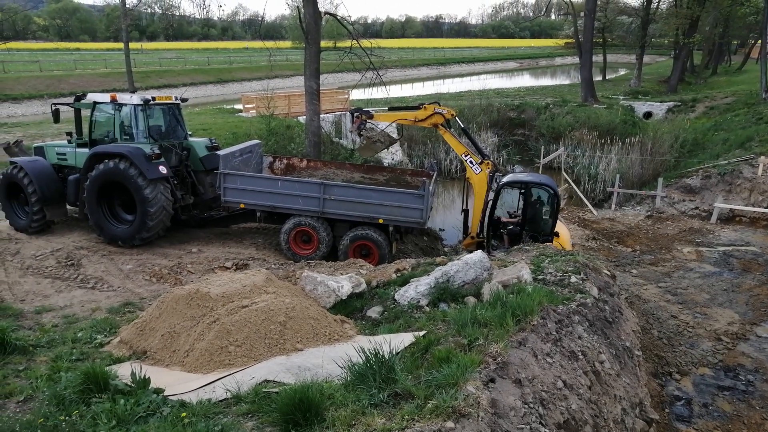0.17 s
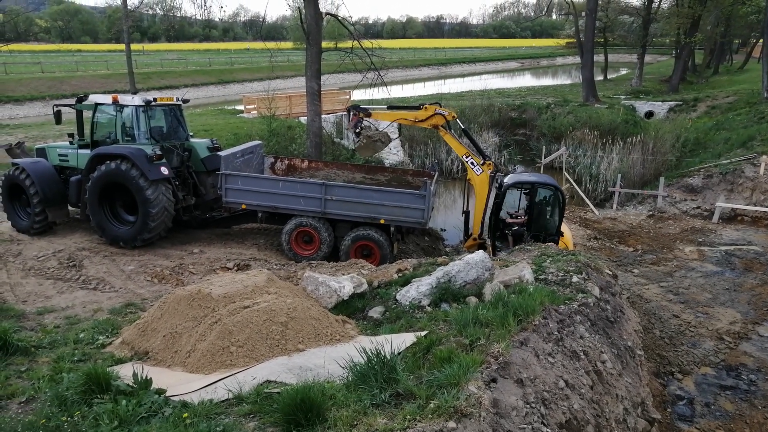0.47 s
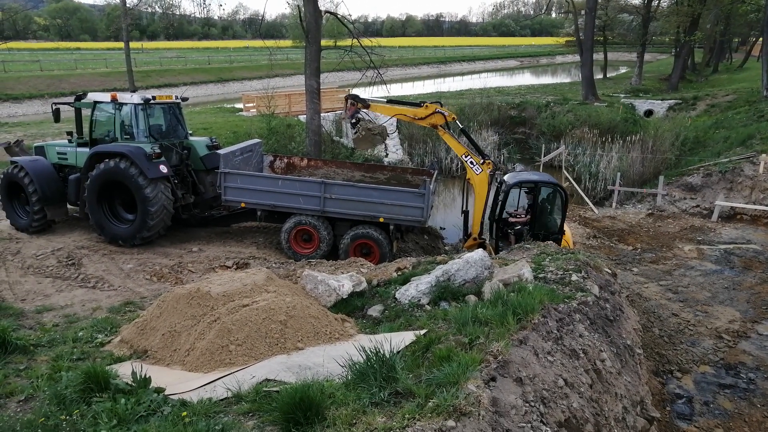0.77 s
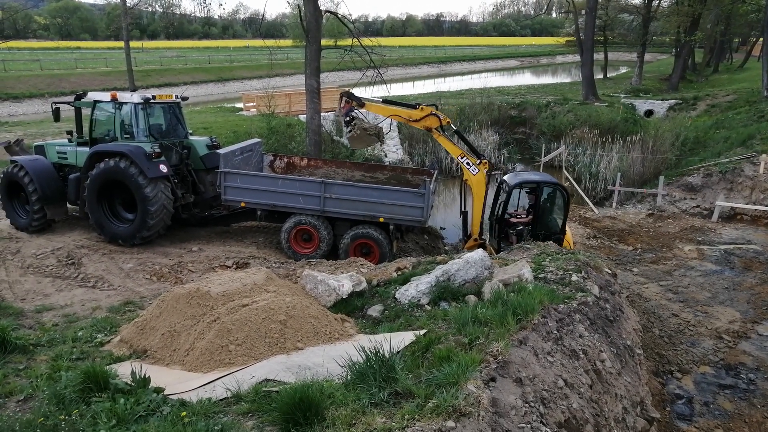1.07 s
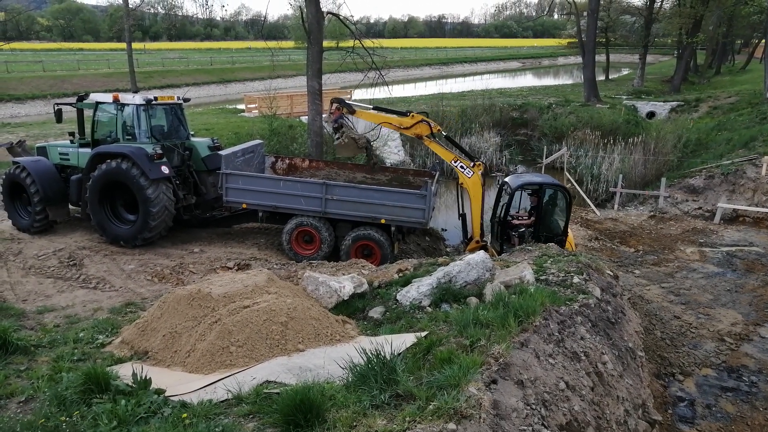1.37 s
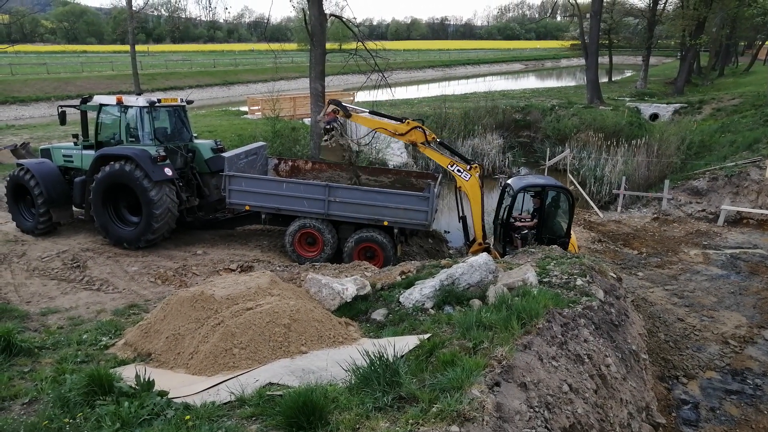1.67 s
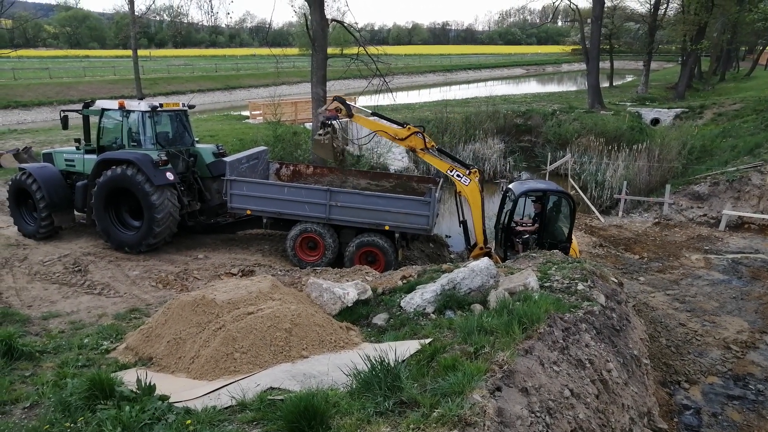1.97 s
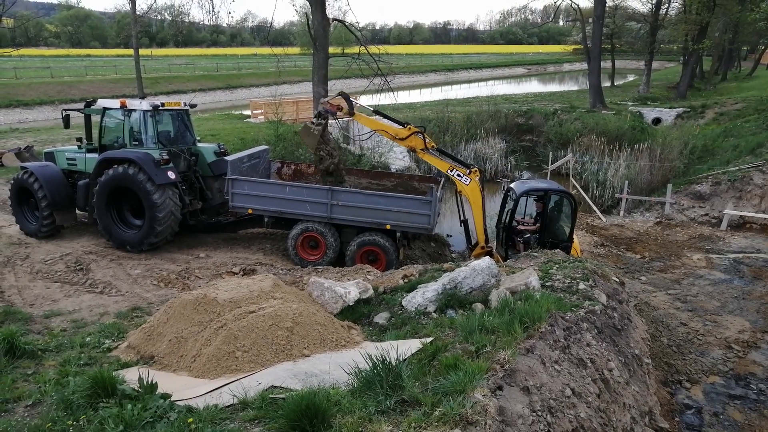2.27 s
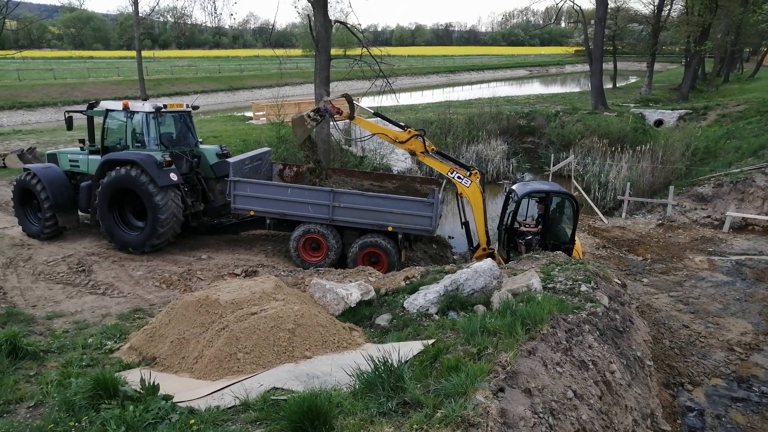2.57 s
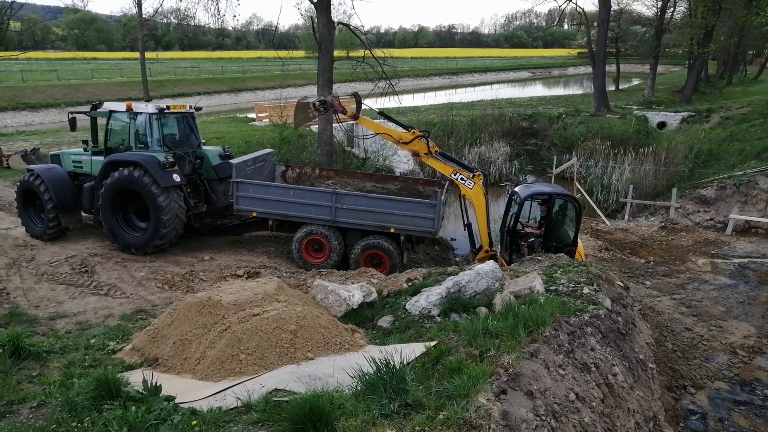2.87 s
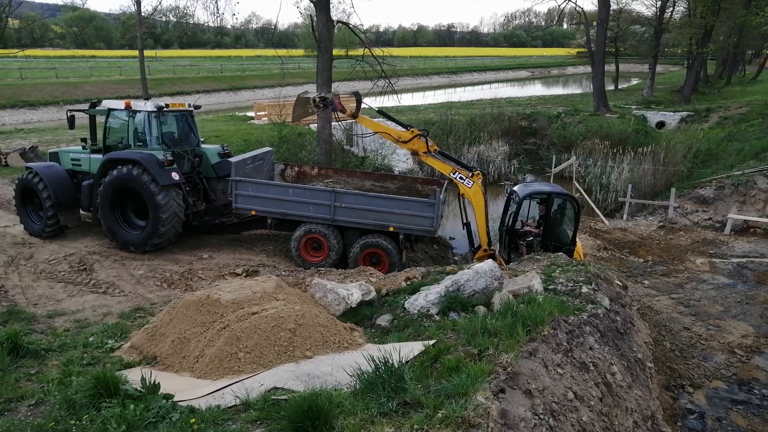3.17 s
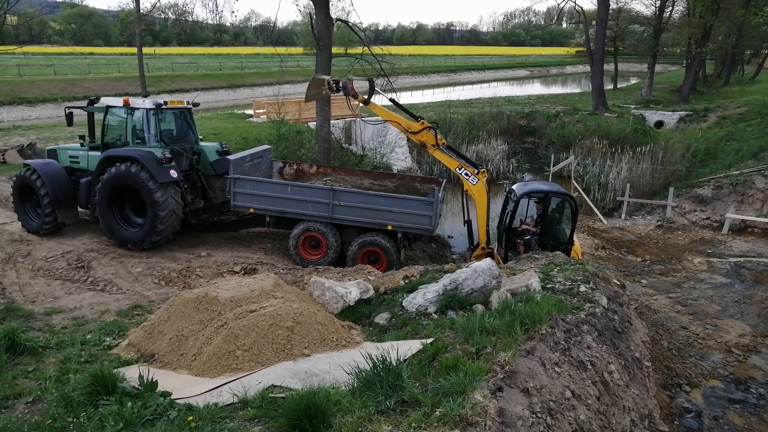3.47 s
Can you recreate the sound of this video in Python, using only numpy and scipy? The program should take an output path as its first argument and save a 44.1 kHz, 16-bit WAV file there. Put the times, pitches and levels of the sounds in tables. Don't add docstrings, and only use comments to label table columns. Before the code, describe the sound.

Earth and stones drop into a trailer in an open yard, single crumbling bursts growing into two gritty surges with ringing pebbles and dull thuds; a diesel idles low, and a faint bird whistles left at the end.

```python
import sys
import numpy as np
from scipy import signal
from scipy.fft import rfft, irfft
from scipy.io import wavfile
from scipy.ndimage import uniform_filter1d

SR = 44100
rng = np.random.default_rng(int(sys.argv[2]) if len(sys.argv) > 2 else 0)


def elevation(decibels):
    levels = np.asarray(decibels, float)
    return 10 ** (levels / 20)


def wav_record(signal):
    frames = np.transpose(np.atleast_2d(signal))
    bounded = np.clip(frames, -1, 1)
    quanta = np.round(bounded * 32767).astype(np.int16)
    wavfile.write(sys.argv[1], SR, quanta)


N = 160083


def rms(x):
    return np.sqrt(np.mean(x ** 2))


def band(x, lo_hz, hi_hz, order=2):
    sos = signal.butter(order, [lo_hz, min(hi_hz, .45 * SR)], "band", fs=SR, output="sos")
    return signal.sosfilt(sos, x)


def curve(table, column):
    table = np.array(table, float)
    return np.interp(np.arange(N) / SR, table[:, 0], table[:, column])


def walk(rate_hz):
    hold = int(SR / rate_hz)
    steps = np.repeat(rng.standard_normal(N // hold + 1), hold)
    w = uniform_filter1d(uniform_filter1d(steps, hold), hold)[:N]
    return w / w.std()


def pair(make, alike):
    alike = np.clip(alike, 0, 1)
    return np.sqrt(alike) * make() + np.sqrt(1 - alike) * np.array([make(), make()])


# [dB, load on the exhaust boom]
ENGINE_RUN = [(0, 48.2, -41.5, -4), (.25, 49.39, -43.5, -9), (.75, 50.15, -45, -17), (.9, 51.32, -45, 8),
              (1.3, 50.68, -48, 4.5), (1.75, 50.57, -45, 3.5), (2.5, 48.48, -47, 1.5),
              (2.98, 48.86, -48.5, 3), (3.18, 53.3, -45, 9.5), (3.35, 50.5, -44, 8), (3.63, 49, -44.5, -2)]
# order [multiple of firing rate], level_db [dB]
FIRING_ORDERS = [(1, 1), (2, -12.5), (2.25, -15.5), (2.5, -18.5), (3, -17), (4, -14), (4.5, -21), (5, -24),
                 (6, -26.5)]


def engine():
    phase = 2 * np.pi * np.cumsum(curve(ENGINE_RUN, 1)) / SR
    x = 0
    for order, level_db in FIRING_ORDERS:
        k = round(4 * order) / 4
        wavers = k > 1
        level = elevation(level_db + wavers * 3 * walk(9.07))
        jitter = 0.11 * k * walk(4.74) * wavers
        x = x + level * np.sin(k * phase + jitter + 6 * rng.random())
    boom = elevation(-10.5 + curve(ENGINE_RUN, 3) + 0.14 * walk(13.88))
    x = x + boom * np.sin(3.5 * phase)
    return np.sqrt(2) * elevation(curve(ENGINE_RUN, 2) - 6.5) * x


# [dB of extra dust, falling and in the air]
DRYNESS = [(0, 2), (.66, 3), (.76, 0), (1.16, -6), (1.19, 1), (1.62, 4), (1.8, 2), (2.7, 0.5), (2.95, -3.5),
           (3.25, 0.5), (3.45, -2.5)]


def dryness_db():
    return curve(DRYNESS, 1)


# pitch_hz [Hz], level_db [dB per Hz]
YARD_SPECTRUM = [(32, -8), (70, -8.5), (180, 2.5), (420, -21), (750, -12.5), (1500, -21), (4000, -36.5),
                 (14000, -26.5)]


def yard():
    out, swell, table = 0, walk(0.84), np.array(YARD_SPECTRUM, float)
    for hz in 30 * 2 ** np.arange(0, 9.1, .5):
        noise = pair(lambda: rng.standard_normal(N), 1 - hz / 1520.0)
        x = band(noise, hz / 1.35, hz * 1.15, order=1)
        level_db = np.interp(np.log(hz), np.log(table[:, 0]), table[:, 1])
        level_db = level_db + (hz > 7000) * dryness_db() + 0.25 * swell + 1.3 * walk(8.0)
        out = out + x * elevation(level_db)
    return out * elevation(-58.5) / rms(out)


# start_s [s], coarse_db [dB], fine_db [dB], crumble_s [s]
CLOD_HITS = [(0.043, -48.5, -42.5, 0.048), (0.292, -39, -42, 0.022), (0.4529, -33, -51, 0.016),
             (0.476, -35, -56, 0.019), (0.573, -50.5, -42.5, 0.014), (0.6878, -33, -38, 0.02),
             (0.8793, -38, -40.5, 0.0092), (0.908, -64, -44, 0.013), (0.985, -30, -49, 0.018),
             (1.0565, -62, -75, 0.018), (1.1792, -46, -40, 0.015), (1.202, -28, -30, 0.016),
             (1.27, -39, -31, 0.024), (1.3045, -47, -38, 0.024), (1.3359, -32, -31, 0.024),
             (1.3881, -50, -39, 0.01), (1.474, -35, -34, 0.01), (1.5194, -58, -37.5, 0.016),
             (1.552, -43, -36, 0.023), (1.6, -39.5, -37.5, 0.023), (1.713, -54, -32.5, 0.011),
             (1.86, -35.5, -35, 0.015), (2.0906, -34, -56, 0.018), (2.3394, -59, -39.5, 0.018),
             (2.4878, -39, -37, 0.023), (3.004, -26, -31, 0.026), (3.1394, -51, -56, 0.021),
             (3.356, -36.5, -44.5, 0.024), (3.489, -29, -65, 0.022), (3.5444, -42.5, -55, 0.021)]


def clod_power(column, offset_db):
    t, power = np.arange(N) / SR, np.zeros(N)
    for row in CLOD_HITS:
        crumble_s = max(row[3], .004)
        age = np.clip(t - row[0] + .003, 0, None)
        rise = 1 - np.exp(-age / (.3 * crumble_s))
        fall = np.exp(-(age / crumble_s) ** 2) + elevation(-8.5) * np.exp(-age / 0.045)
        power += (elevation(row[column] + offset_db) * rise * fall) ** 2
    return power


def grit(lo_hz, hi_hz, per_s, spread_db, alike, order=4):
    def draw():
        size = rng.standard_normal(N) * (rng.random(N) < per_s / SR)
        return size * elevation(spread_db * np.clip(-np.log(rng.random(N) + 1e-9), 0, 3))
    x = band(pair(draw, alike), lo_hz, hi_hz, order=order)
    return x / rms(mics(x[:, :N // 3]).mean(axis=0))


def pebbles(hz):
    return elevation(-11) * grit(.97 * hz, 1.03 * hz, 130, 0.89, alike=0.82, order=1)


# start_s [s], coarse_db [dB, soil], fine_db [dB, grit], lumps_db [dB]
POURS = [(1.17, -58.5, -56, -99), (1.42, -61, -52, -60), (1.46, -65, -59.5, -69), (1.7, -63, -51.5, -89),
         (1.745, -53, -44, -55), (1.77, -43.5, -38.5, -52), (1.94, -46.5, -42, -57),
         (2.1, -47.5, -43.5, -51), (2.22, -53.5, -50.5, -50.5), (2.26, -55.5, -53.5, -48.5),
         (2.47, -51.5, -44, -54), (2.51, -44, -42, -52), (2.66, -39, -37, -46.5), (2.9, -40, -37.5, -52),
         (3.17, -47, -46.5, -54.5), (3.21, -58, -53.5, -61), (3.42, -58.5, -59, -59),
         (3.63, -76.5, -74, -65)]


def soil():
    pouring = np.arange(N) / SR > POURS[0][0]
    surge = walk(28.19)

    def envelope(column, clods, patchy_db):
        patches = np.minimum(0.5 * surge + walk(45.01), 2)
        pour = elevation(curve(POURS, column) + patchy_db * patches)
        return np.sqrt(clods + pouring * pour ** 2)

    knock, spray = clod_power(1, -11), clod_power(2, -8)
    coarse = grit(964, 3455, 4000, 0.91, alike=0.43) + pebbles(2038) + pebbles(2500)
    fine = grit(3220, 8080, 5000, 2.0, alike=0.23) + pebbles(4660) + pebbles(5200)
    dust = elevation(-10.5 + dryness_db()) * grit(8900, 15350, 900, 1.2, alike=0.19, order=2)
    lumps = grit(344, 1040, 3000, 0.98, alike=0.93, order=2)
    return (envelope(1, knock, 1.0) * coarse
            + envelope(2, spray, 1.0) * fine
            + envelope(2, spray * elevation(2 * -4), 1.0) * dust
            + envelope(3, knock * elevation(2 * -20), 1.2) * lumps)


# start_s [s], level_db [dB], pitch_hz [Hz]
PEBBLE_TICKS = [(0.244, -54, 8800), (0.349, -51, 10000), (.37, -45, 10500), (.575, -42, 8000),
                (.477, -46, 12500), (0.615, -41, 12900), (.645, -42, 13000), (0.695, -31, 4900),
                (.733, -40, 8100), (1.336, -30, 5200), (1.556, -31, 5300), (1.715, -29, 5140),
                (2.211, -26, 5200), (2.34, -29.5, 5300), (2.487, -29.5, 5300), (1.176, -49, 11100),
                (1.527, -44, 11000), (1.624, -40, 12000), (2.363, -37, 11000), (3.244, -47, 10000),
                (3.529, -53, 11050)]


def ticks():
    out, t = np.zeros((2, N + SR)), np.arange(SR // 2) / SR
    for s, db, hz in PEBBLE_TICKS:
        snap = rng.standard_normal((2, len(t))) + 0.59 * np.cos(2 * np.pi * hz * t)
        snap = band(snap * np.exp(-t / 0.0018), 0.62 * hz, min(2 * hz, 15300))
        k = int(s * SR)
        out[:, k:k + len(t)] += elevation(db - 1.0 - 10.2 * (hz < 6500)) * snap
    return out[:, :N]


# start_s [s], level_db [dB], pitch_hz [Hz]
LARGE_STONES = [(0.4565, -35, 2600), (0.4743, -30, 2070), (0.6945, -34.5, 2450), (0.9888, -32.5, 2330),
                (1.2076, -31, 2270), (1.7522, -30.5, 2590), (1.7796, -29.5, 2264), (1.8607, -31, 2180),
                (1.9174, -34, 2500), (2.0872, -38, 2480), (2.169, -32, 2040), (2.3156, -38, 2434),
                (2.3875, -38.5, 2400), (2.4794, -40, 2570), (2.5074, -27, 2240), (2.584, -30, 2440),
                (2.6326, -29, 2520), (2.6644, -32, 2480), (2.7324, -23.5, 2340), (2.796, -30, 2450),
                (2.9237, -28, 2614), (3.007, -25, 2600), (3.0924, -24, 3170), (3.1795, -34, 2660),
                (3.4954, -33, 2400)]
# start_s [s], level_db [dB], pitch_hz [Hz]
SMALL_STONES = [(1.276, -34, 5300), (1.474, -30.5, 5130), (1.7491, -25, 5310), (1.8527, -32.5, 5090),
                (1.93, -31, 5170), (2.0115, -24.5, 5240), (2.0531, -24.5, 5200), (2.0908, -26, 5260),
                (2.1819, -36, 5300), (2.2934, -40, 5390), (2.4036, -28.5, 5400), (2.6195, -23, 5240),
                (2.6647, -25, 4600), (2.689, -29, 5190), (2.8695, -27, 5200), (2.8888, -23, 5325),
                (3.0518, -24, 5210), (3.101, -32, 5440)]


def stones():
    out, t = np.zeros((2, N + SR)), np.arange(SR // 20) / SR
    for table, offset_db in ((LARGE_STONES, -11.5), (SMALL_STONES, -15.5)):
        for s, db, hz in table:
            detune, phase, delay, side = rng.random(4)
            u = t * hz / 7.7
            second_hz = hz * (1.06 + 0.11 * detune)
            modes = np.sin(2 * np.pi * hz * t) + 0.5 * np.sin(2 * np.pi * (second_hz * t + phase))
            ring = (1 - np.exp(-6 * u)) * np.exp(-u) * modes
            pan = elevation(np.array([[-1], [1]]) * 2 * side)
            for late_s, size in ((0, 1), (.006 + .008 * delay, .4)):
                k = int((s + late_s) * SR)
                out[:, k:k + len(t)] += size * elevation(db + offset_db) * ring * pan
    return out[:, :N]


# [s, to -60 dB]
BED_THUDS = [(0.68, -49, 335, 0.17), (.985, -45, 810, 0.18), (1.556, -45, 851, 0.112),
             (1.91, -38, 720, 0.15), (3.1, -39, 154, 0.16), (2.1, -38, 150, 0.16),
             (2.265, -37.5, 125, 0.28), (2.8, -45, 600, .1), (3.13, -40.5, 850, 0.25),
             (3.5, -41, 500, 0.14), (3.135, -43, 310, 0.29), (2.6, -44, 370, 0.12), (3.19, -48, 730, 0.07),
             (2.4, -45, 1200, 0.095), (2.92, -46, 700, .2), (3.26, -48.5, 290, .4), (0.81, -52, 320, .15),
             (3.079, -50, 277.6, 0.54), (3.071, -46, 117.4, 1)]


def thuds():
    out, t = np.zeros((2, N + SR)), np.arange(SR // 2) / SR
    for s, db, hz, ring_s in BED_THUDS:
        env = np.exp(-t * np.log(1000) / ring_s) * (1 - np.exp(-t * hz / 3))
        sag = 1 - 0.209 * np.minimum(t / ring_s, 1)
        tone = min(550 / hz, 1) * np.sin(2 * np.pi * hz * t * sag)
        noise = rng.standard_normal(len(t)) * np.sqrt(SR / hz / 4)
        rumble = min(hz / 400, 1.2) * band(noise, 0.67 * hz, 1.47 * hz)
        k = int(s * SR)
        out[:, k:k + len(t)] += elevation(db - 1.0) * env * (tone + rumble)
    return out[:, :N]


# start_s [s], length_s [s], from_hz [Hz], to_hz [Hz], level_db [dB]
BIRD_CALL = [
    (3.53, .025, 4830, 4860, -70),
    (3.558, 0.026, 4850, 4890, -60),
    (3.592, 0.035, 4890, 5000, -57),
]


def bird():
    out, t = np.zeros(N), np.arange(N) / SR
    for s, length_s, from_hz, to_hz, db in BIRD_CALL:
        u = np.clip((t - s) / length_s, 0, 1)
        phase = 2 * np.pi * np.cumsum(from_hz + (to_hz - from_hz) * u) / SR
        out += elevation(db) * np.sqrt(np.sin(np.pi * u).clip(0)) * np.sin(phase)
    return out * elevation(np.array([[0], [-18]]))


def scene():
    return engine() + yard() + soil() + ticks() + stones() + thuds() + bird()


# pitch_hz [Hz], width_hz [Hz], level_db [dB]
HOUSING = [(738, 135, 7.5), (1214, 86, -5.5), (1400, 41, -2), (2337, 410, 5.5), (2816, 144, -6),
           (2964, 496, 6), (4143, 149, -9.5)]
# pitch_hz [Hz], width_hz [Hz], level_db [dB]
LEFT_MIC = [(5070, 600, -1.5), (6200, 220, 2.5), (8550, 1140, 7.5), (10000, 280, 5), (13440, 3260, -5.5),
            (14900, 450, 4)]
# pitch_hz [Hz], width_hz [Hz], level_db [dB]
RIGHT_MIC = [(2360, 850, 1.5), (4280, 280, 4.5), (5300, 1390, 15), (5310, 400, 3), (5950, 52, 2.5),
             (8000, 260, -31), (10000, 3280, -6), (12500, 1700, -11), (14700, 360, 4.5)]


def mics(x):
    hz = np.fft.rfftfreq(2048, 1 / SR)
    out = []
    for channel, own, level_db in ((0, LEFT_MIC, 0), (1, RIGHT_MIC, 4.5)):
        gain_db = level_db + sum(g * np.exp(-((hz - f) / w) ** 2) for f, w, g in [*HOUSING, *own])
        cepstrum = irfft(np.log(elevation(gain_db)))
        cepstrum[1:1024] *= 2
        cepstrum[1025:] = 0
        response = irfft(np.exp(rfft(cepstrum)))[:700]
        out.append(signal.oaconvolve(x[channel], response)[:N])
    return np.array(out)


def band_limit(x):
    return signal.sosfilt(signal.butter(12, 15830, fs=SR, output="sos"), x)


def record(dry):
    top_cut = signal.ellip(8, .2, 70, 15300, fs=SR, output="sos")
    mix = signal.sosfilt(top_cut, mics(dry))
    return band_limit(mix)


dry = scene()
out = record(dry)
wav_record(out)
```